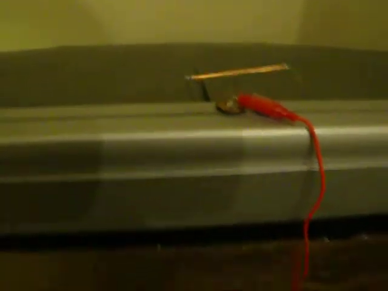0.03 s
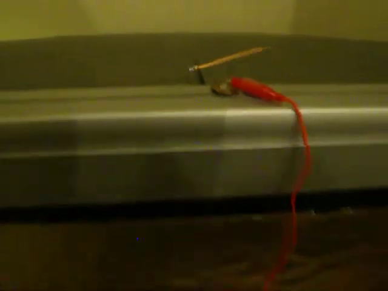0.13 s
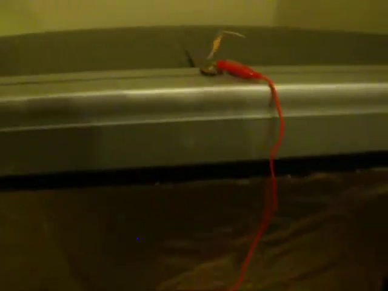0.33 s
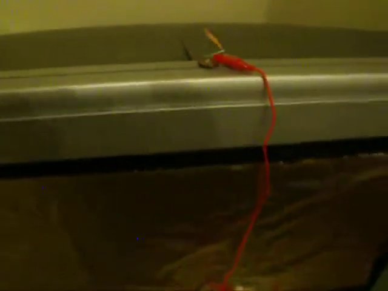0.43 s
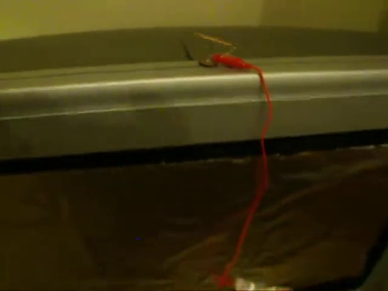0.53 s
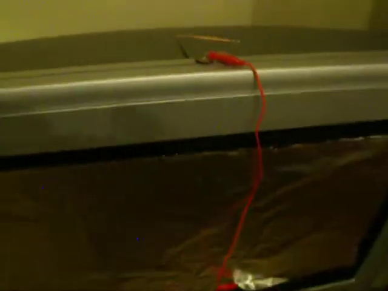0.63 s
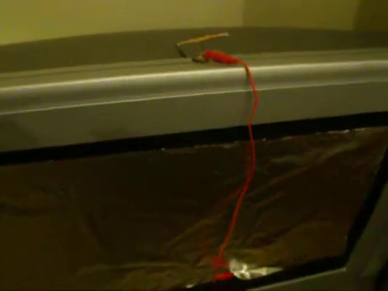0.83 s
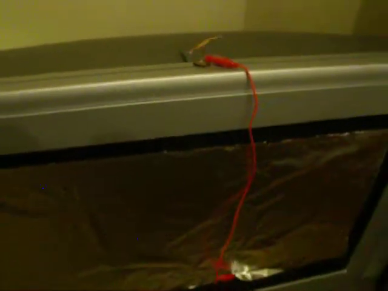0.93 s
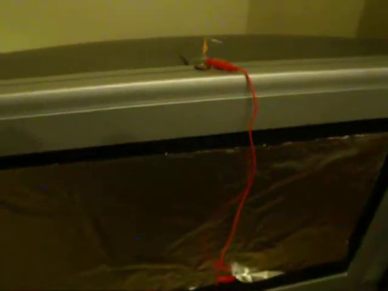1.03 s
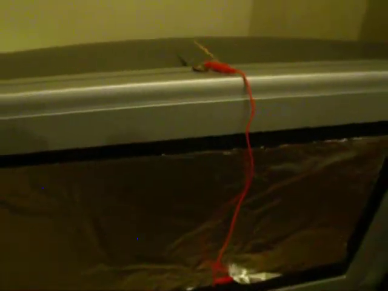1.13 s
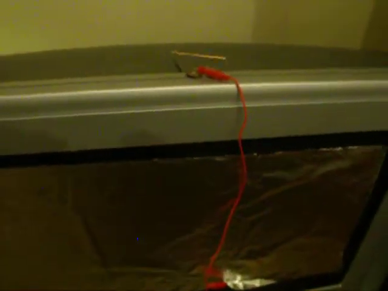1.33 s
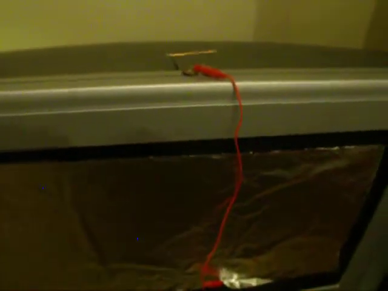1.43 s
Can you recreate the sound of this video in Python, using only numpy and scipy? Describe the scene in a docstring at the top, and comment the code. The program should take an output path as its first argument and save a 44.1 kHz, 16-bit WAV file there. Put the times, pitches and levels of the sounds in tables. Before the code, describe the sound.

An even high-voltage hiss fills a quiet room, carrying a faint buzz and electronic whine. After a dull tick, a spark cracks and overloads the microphone; a weaker snap follows, then three soft ticks.

```python
"""Sparks from a charged screen

A foil-covered screen is charged to high voltage and spins a small wire rotor in a quiet room.
An even hiss with a trace of mains buzz and a thin electronic whine runs throughout. Two sparks snap,
each a quick run of one-sided spikes, among a few dull ticks and one soft, very low bump of air.
The mono recorder loses the high treble and overloads on the louder spark."""
import sys
import numpy as np
from scipy import signal
from scipy.fft import rfft, irfft
from scipy.io import wavfile

SR = 44100
rng = np.random.default_rng(int(sys.argv[2]) if len(sys.argv) > 2 else 0)


def unload_wav(signal):
    """Save mono or channel-first audio to the path in sys.argv[1] as 16-bit WAV at rate SR, clipped to [-1, 1]."""
    wavfile.write(
        sys.argv[1],
        SR,
        np.round(np.clip(np.atleast_2d(signal).T, -1, 1) * 32767).astype(np.int16),
    )


N = 66150  # 1.5 seconds


def from_db(db):
    """Turn decibels into a number to multiply a sound by."""
    return 10 ** (np.asarray(db) / 20)


def rms_one(x):
    """Scale a sound so that its average strength (rms) is 1."""
    return x / np.sqrt(np.mean(x ** 2) + 1e-20)


def seconds():
    """The time of every sample."""
    return np.arange(N) / SR


def coloured(x, curve):
    """Turn each frequency up or down along a curve of (f/Hz, gain/dB) points."""
    hz, db = np.transpose(curve)
    bin_hz = np.maximum(np.arange(N + 1) * SR / (2 * N), 1)
    gain = from_db(np.interp(np.log(bin_hz), np.log(hz), db))
    return irfft(rfft(x, 2 * N) * gain)[:N]


def one_pole(x, hz, kind):
    """A gentle filter: "low" keeps what lies below hz, "high" what lies above."""
    gentle = signal.butter(1, min(hz, SR / 3), kind, fs=SR, output="sos")
    return signal.sosfilt(gentle, x + 1e-18)


def drift(rate_hz):
    """A slow random wander, about 1 in size: noise smoothed twice."""
    smoothed = one_pole(rng.standard_normal(N), rate_hz, "low")
    return rms_one(one_pole(smoothed, rate_hz, "low"))


def hiss():
    """Even static that swells briefly once in each cycle of the mains power."""
    # tone colour of the hiss: f/Hz, relative level/dB
    hiss_curve = [(12, 11.5), (45, 1), (250, 1.6488), (850, 0.3903), (1180, 3), (1420, -0.6688), (1650, 1),
                  (2800, -0.6862), (5000, -0.6537)]
    level_db = -34.5
    mains_hz, buzz_depth, buzz_sharpness = 60, 0.3, 8.0
    swell = np.exp(buzz_sharpness * (np.cos(2 * np.pi * mains_hz * seconds()) - 1))
    static = coloured(rng.standard_normal(N), hiss_curve)
    return from_db(level_db) * rms_one(static * (1 + buzz_depth * swell))


def whine():
    """The electronics give off thin tones, each wavering a little in pitch."""
    # steady tones, before the recorder dulls them: f/Hz, rms level/dB
    tones = [(544, -62.5), (1270, -60.5), (1588, -67), (2223, -69), (5012, -57), (6012, -75.5)]
    wander_hz = 1.5
    out = np.zeros(N)
    for hz, db in tones:
        pitch_hz = hz + wander_hz * drift(rate_hz=11)
        cycles = np.cumsum(pitch_hz) / SR + rng.random()
        out += np.sqrt(2) * from_db(db) * np.sin(2 * np.pi * cycles)
    return out


def ticks():
    """Dull ticks: each is a ring that dies quickly, a one-sided push and a little crackle."""
    # one tick a row: t/s, ring level/dB, f/Hz, width/octaves, push/ring ratio, crackle/ring ratio
    dull_ticks = [ (0.1307, -23.5, 700, 0.5515, 1.551, 0.2405), (0.9871, -25.5, 860, 0.6383, .02, 0.755),
                  (1.1510, -29, 380, 1.093, .02, 0.28), (1.3119, -22.5, 385, 1.23, .02, 0.8405), ]
    push_fade_s, crackle_fade_s = 0.0013, 0.0022
    out = np.zeros(N)
    for start_s, db, hz, octaves, push_size, crackle_size in dull_ticks:
        age = np.maximum(seconds() - start_s, 0)
        spread = 2 ** (octaves / 2)
        band = signal.butter(2, [hz / spread, hz * spread], "band", fs=SR, output="sos")
        kick = signal.unit_impulse(N, int(start_s * SR))
        ring = signal.sosfilt(band, kick + 1e-18)  # a kicked filter rings near its own pitch
        push = push_size * np.exp(-age / push_fade_s)
        crackle = crackle_size * rng.standard_normal(N) * np.exp(-age / crackle_fade_s)
        out -= from_db(db) * (ring / np.abs(ring).max() + (age > 0) * (push + crackle))
    return out


def air_bump():
    """The air pressure at the microphone makes one slow, soft swing."""
    centre_s, pitch_hz, half_length_s = 0.333, 15.18, 0.02422
    t = seconds() - centre_s
    fade_in_out = np.exp(-(t / half_length_s) ** 2)
    return from_db(-26) * np.sin(2 * np.pi * pitch_hz * t) * fade_in_out


def sparks():
    """Each discharge makes a spike that jumps at once and drains in a fraction of a millisecond."""
    # two sparks of three spikes each: t/s, level before smoothing/dB
    spikes = [ (0.4872, 8.5), (0.4897, 2.5), (0.4902, 8), (0.6916, -5.5), (0.6938, -19.5), (0.69420, -7.5),
              ]
    drain_s, smoothing_hz = 0.00017989, 8350
    out = np.zeros(N)
    for start_s, db in spikes:
        age = np.maximum(seconds() - start_s, 0)
        out -= from_db(db) * (age > 0) * np.exp(-age / drain_s)
    return one_pole(out, smoothing_hz, "low")


def scene():
    """All the sounds add up at one microphone, the same in both channels."""
    mono = hiss() + whine() + ticks() + air_bump() + sparks()
    return np.array([mono, mono])


def record(dry):
    """The recorder drops the deepest bass and high treble, then flattens peaks too big for it."""
    # how the recorder's treble falls away: f/Hz, gain/dB
    treble_loss = [(5080, -1), (5400, -4.5), (5700, -9), (5950, -12), (6200, -26.5), (6600, -80)]
    # softening of the overload's harsh top: f/Hz, gain/dB
    softening = [(5300, -0.5), (6300, -11.5), (9000, -6), (15000, -6.5)]
    bass_cut_hz, top_cut_hz, peak_limit = 9, 16500, 0.698
    narrowed = [coloured(channel, treble_loss) for channel in one_pole(dry, bass_cut_hz, "high")]
    clipped = np.clip(narrowed, -peak_limit, peak_limit)
    softened = np.array([coloured(channel, softening) for channel in clipped])
    top_cut = signal.cheby2(12, 70, top_cut_hz, fs=SR, output="sos")
    return signal.sosfilt(top_cut, softened)


dry = scene()
out = record(dry)
unload_wav(out)
```